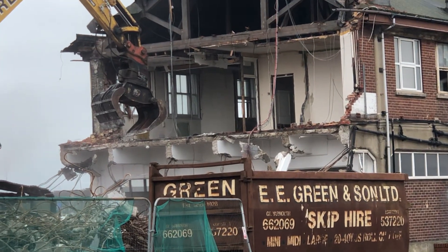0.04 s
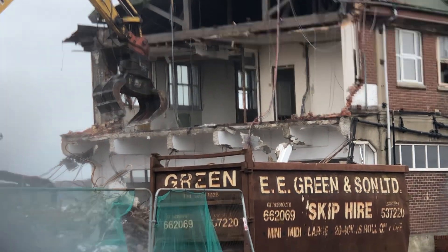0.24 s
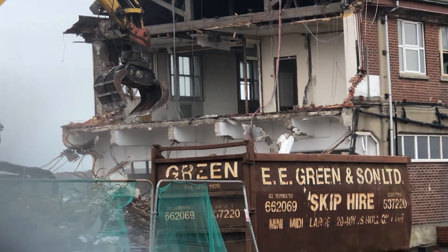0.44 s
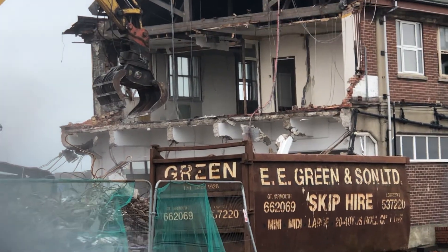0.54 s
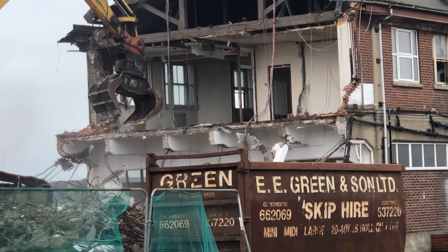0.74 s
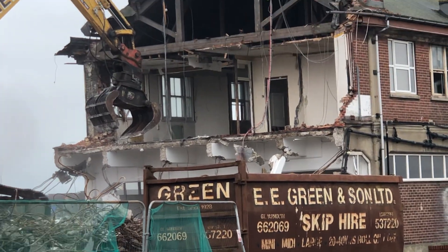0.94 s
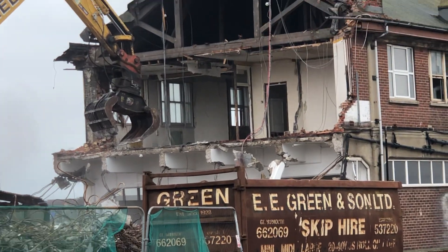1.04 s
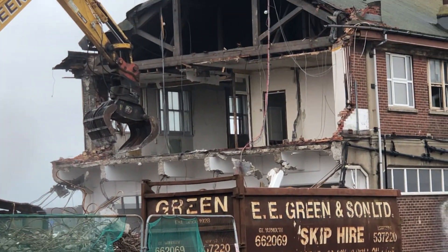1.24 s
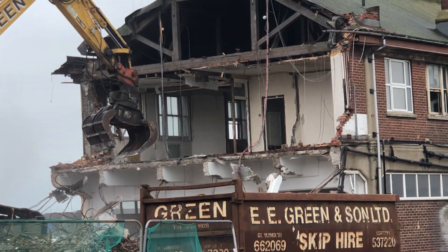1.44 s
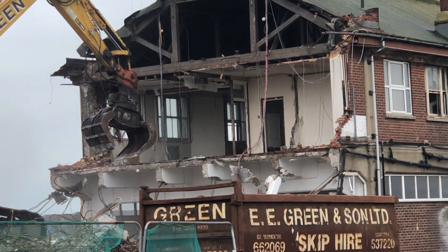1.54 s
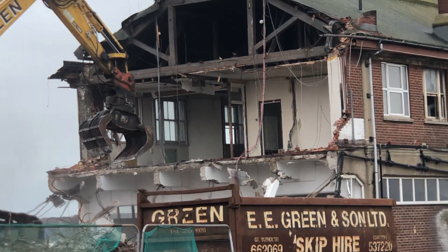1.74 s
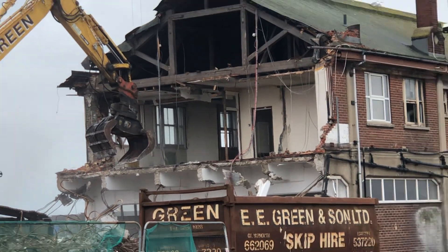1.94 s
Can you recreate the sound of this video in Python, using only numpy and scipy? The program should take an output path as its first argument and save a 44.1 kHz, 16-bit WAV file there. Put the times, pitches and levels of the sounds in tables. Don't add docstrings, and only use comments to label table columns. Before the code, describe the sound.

Demolition debris crashes down with a sharp crack, rubble tumbling, then two separate heavy knocks outdoors

```python
import sys
import numpy as np
from scipy import signal
from scipy.fft import rfft, irfft, next_fast_len
from scipy.io import wavfile
from scipy.ndimage import uniform_filter1d, minimum_filter1d, map_coordinates

SR = 44100
rng = np.random.default_rng(int(sys.argv[2]) if len(sys.argv) > 2 else 0)


def undo_db(level):
    steps = np.asarray(level, float) / 20
    return 10 ** steps


def master_out(mix):
    frames = np.transpose(np.atleast_2d(mix))
    ceiling = np.clip(frames, -1, 1)
    pcm = np.round(ceiling * 32767).astype(np.int16)
    wavfile.write(sys.argv[1], SR, pcm)


N = 88200
M = next_fast_len(N + 8192)
HZ = np.fft.rfftfreq(M, 1 / SR)
T = np.arange(N) / SR


def unit(x):
    return x / np.sqrt(np.mean(x ** 2) + 1e-20)


def colour(points):
    hz, db = np.transpose(points)
    return undo_db(np.interp(np.log(HZ + 1), np.log(hz + 1), db, left=-120, right=-120))


def curves(rows):
    s, *columns = np.transpose(rows)
    return [np.interp(T, s, column, left=-120, right=-120) for column in columns]


def wobble(rate):
    knots = rng.standard_normal(int(N * rate / SR) + 4)
    return map_coordinates(knots, [np.arange(N) * rate / SR])


def filtered(x, gain):
    return irfft(rfft(x, M) * gain, M)[:N]


def noise(points):
    return unit(filtered(rng.standard_normal(N), colour(points)))


def swell(centre_s, width_s):
    return np.exp(-.5 * ((T - centre_s) / width_s) ** 2)


def resonance(hz, above_oct, below_oct=None):
    octaves = np.log2((HZ + 1) / hz)
    width = np.where(octaves > 0, above_oct, below_oct or above_oct)
    return np.exp(-.5 * (octaves / width) ** 2)


def peak(response):
    return response * M / (2 * abs(response).sum())


def at(s):
    return np.exp(-2j * np.pi * HZ * s)


def causal(gain):
    cepstrum = irfft(np.log(gain + 1e-5), M)
    k = np.arange(M)
    fold = np.where(k < M / 2, 2, 0) / np.where(k == 0, 2, 1)
    return np.exp(rfft(cepstrum * fold))


# (time [s], level [dB])
DIESEL = [
    (0, -55.5),
    (.7, -56),
    (1.15, -56),
    (1.36, -54),
    (1.602, -57.5),
    (1.859, -54),
    (1.898, -49),
    (2.0, -56.5),
]
# (frequency [Hz], density [dB per Hz])
DRONE = [(15, -31), (25, -4), (157, -7), (184, -6.5), (205, -13.5), (252, -14.5), (380, -21), (450, -13),
         (580, -55.5), (990, -120)]
# (frequency [Hz], density [dB per Hz])
FAN = [(190, -37.5), (330, -13), (385, -28), (603, -1), (1030, 0.5), (1110, -5), (1170, -2.5),
       (1900, -17.5), (3500, -56), (4550, -73), (7700, -120)]
# (frequency [Hz], level [dB])
WHINE = [(37.7, -66.5), (80.7, -66), (543.7, -73), (775.2, -70), (952.8, -82), (1055, -70.5), (1179, -72),
         (1502, -77.5), (2223, -92)]
DRONE_DB, DRONE_GROWS = -2, 1.2
STRAIN_S, STRAIN_WIDTH_S, STRAIN_HZ, STRAIN_DB = 1.33, .09, 2223, -75.5


def excavator():
    s, db = np.transpose(DIESEL)
    load_db = np.interp(T, s, db)
    roar = undo_db(load_db + 0.4 * wobble(4.2) + 0.52 * wobble(35)) * noise(FAN)
    drone_db = db.mean() + DRONE_DB + DRONE_GROWS * (load_db - db.mean())
    drone = undo_db(drone_db + 1.5 * wobble(12)) * noise(DRONE)
    tones = 0
    for hz, level_db in WHINE:
        phase = 2 * np.pi * hz * T + 2.43 * wobble(15)
        tones = tones + undo_db(level_db + 4.5 + 4.3 * wobble(5.7)) * np.sin(phase)
    strain_phase = 2 * np.pi * STRAIN_HZ * T + 2.5 * wobble(25)
    strain = undo_db(STRAIN_DB + 3 * wobble(20)) * swell(STRAIN_S, STRAIN_WIDTH_S) * np.sin(strain_phase)
    return roar + drone + tones + strain


# (time [s], level [dB], centre [Hz], width [octaves])
TICKS = [(0.2259, -46.5, 1096, 0.48), (0.2387, -38.5, 1090, 0.42), (0.2492, -12.5, 1300, 0.27),
         (.2508, -16, 480, .3), (0.4188, -32, 851, .3), (.675, -46, 1485, 0.22), (.6748, -35.5, 760, .22),
         (.613, -30, 850, .15), (.646, -40, 850, .2), (.6295, -36, 850, .15), (.297, -18, 850, .12),
         (1.742, -25, 620, .33), (.3335, -17, 760, .2), (.2735, -20, 800, .13), (1.762, -40, 70, .3),
         (1.5125, -11.5, 706, 0.23), (1.516, -27, 427, 0.12), (1.523, -38, 600, .2),
         (0.3333, -45.5, 3190, 0.3), (.5845, -52, 2700, 0.23), (0.3318, -50.5, 4380, 0.39),
         (0.3359, -39, 2470, 0.3), (.5843, -53, 3970, 0.16), (0.585, -45.5, 1750, 0.28),
         (.5962, -46, 2520, 0.19), (.597, -38.5, 1636, 0.18), (0.6016, -30.5, 1430, 0.18),
         (.6015, -53.5, 3260, 0.31), (.607, -53, 2330, 0.11), (0.649, -48, 1500, 0.27),
         (1.511, -57, 3500, 0.2), (.599, -47.5, 2280, 0.34), (1.5122, -45, 2260, 0.21),
         (1.7308, -31.5, 1730, 0.49), (1.7314, -45.5, 4200, 0.35), (1.7418, -46, 2170, 0.26),
         (1.7415, -52.5, 5000, 0.5), (1.888, -57, 800, 0.71)]


def ticks():
    total = sum(undo_db(db) * peak(resonance(hz, width)) * at(s) for s, db, hz, width in TICKS)
    return irfft(total, M)[:N]


# (time [s], knock [dB], knock tilt [dB per octave], thud pitch [Hz], thud [dB])
BLOWS = [(.2265, -36, 0.5, 381, -41), (0.237, -41, -0.5, 299, -43), (0.2485, 1.5, 5.5, 205, -7.5),
         (0.2656, -15.5, -0.3, 70, -14.5), (.3315, -11, 0.5, 332, -12.5), (.3347, -15, 8, 95, -13.5),
         (.3372, -30, 0, 150, -13), (.4185, -24.5, -4.5, 110, -21), (.394, -36.5, 0, 90, -32),
         (.5955, -31.5, 1.5, 307, -31), (1.5107, -3.5, -0.2, 87, -23.5), (1.5131, -31.5, -3.8, 192.3, -8.5),
         (1.7304, -5.5, -0.5, 223, -15), (1.7319, -39.5, -0.5, 76.6, -17.5),
         (1.7411, -21.5, -0.5, 119.5, -23.5)]
# (frequency [Hz], level [dB])
KNOCK = [(60, -59), (200, -17), (420, 0), (680, 2.5), (950, -4), (1300, -14), (1650, -23.5), (1900, -45.5)]
KNOCK_HZ = 700
THUD_OCT, THUD_BELOW_OCT = 0.43, 0.79
ECHO_S, ECHO_SHARE = 0.00352, 0.19


def blows():
    knock, total = causal(colour(KNOCK)), 0
    for s, knock_db, tilt_db, thud_hz, thud_db in BLOWS:
        thud = peak(resonance(thud_hz, THUD_OCT, THUD_BELOW_OCT))
        tilt = undo_db(tilt_db * np.log2((HZ + 50) / KNOCK_HZ))
        total = total + (undo_db(thud_db) * thud + undo_db(knock_db) * peak(knock * tilt)) * at(s)
    return irfft(total * (1 + ECHO_SHARE * at(ECHO_S)), M)[:N]


# (frequency [Hz], level [dB])
SNAP = [(1200, -17.5), (1850, -3), (2400, 1), (3300, -8), (4500, -28), (5300, -48.5), (7000, -44.5),
        (15700, -64)]
CRACK_S, CRACK_DB = .2494, -16


def timber_snap():
    return irfft(undo_db(CRACK_DB) * peak(colour(SNAP)) * at(CRACK_S), M)[:N]


# (time [s], level [dB], brightness [dB])
TUMBLE = [
    [(.254, -17, -2), (.266, -17.5, 3.5), (.3, -16, 3), (.312, -20, 7.5), (.324, -20, -2.5),
     (.336, -18, -3)],
    [(.336, -16.5, 4), (.372, -26, 2.5), (.41, -20.5, -3.5), (.45, -22.5, -2), (.55, -24, -8),
     (.585, -25.5, -4.5), (.655, -34, -3.5), (.679, -41, -4.5), (.688, -66, -2.5)],
]
# (frequency [Hz], level [dB])
LUMPS = [(25, -42), (45, -16), (90, -5), (200, -3), (350, -6.5), (500, -12.5), (800, -39)]
# (frequency [Hz], level [dB])
CHIPS = [(150, -52.5), (330, -16), (450, -6), (600, -1.5), (850, -3), (1050, -14), (1500, -45.5)]
# (frequency [Hz], level [dB])
FLAKES = [(700, -26), (1000, -5), (1350, 3.5), (1650, -4.5), (1900, -24), (2600, -27.5), (4500, -55.5)]
STONES_PER_S, STONE_SPREAD_DB = 2500, 2.5
FLAKES_DB, FLAKES_FADE_DB_PER_S, CLUMP_DB = -18.5, 14.5, 1.1


def rubble():
    out = np.zeros(N)
    since_start = T - TUMBLE[0][0][0]
    flakes_db = FLAKES_DB - FLAKES_FADE_DB_PER_S * since_start + CLUMP_DB * wobble(70)
    for surge in TUMBLE:
        level_db, bright_db = curves(surge)
        layers = (LUMPS, -7.5), (CHIPS, bright_db - 10.5), (FLAKES, bright_db + flakes_db)
        for shape, extra_db in layers:
            hits = (rng.random(N) < STONES_PER_S / SR) * rng.standard_normal(N)
            stones = hits * undo_db(STONE_SPREAD_DB * rng.exponential(size=N))
            scale = np.std(filtered(stones, colour(shape)))
            out += filtered(stones * undo_db(level_db + extra_db), colour(shape)) / scale
    return out


# (time [s], width [s], level [dB])
GRIT = [
    (0.28, 0.014, -50.5),
    (0.336, 0.0047, -46.5),
    (.655, 0.01, -68.5),
]
# (frequency [Hz], level [dB])
SHARDS = [(1700, -27.5), (2200, 2), (2550, -7.5), (2900, -21.5), (4200, -32.5), (6000, -47.5)]


def grit():
    return sum(undo_db(db) * swell(s, width) for s, width, db in GRIT) * noise(SHARDS)


# (time [s], length [s], level [dB])
RATTLES = [
    (.264, .046, -68),
    (.331, .054, -67),
]
# (frequency [Hz], level [dB])
DUST = [(2000, -15.5), (3000, -7), (9000, -9.5), (15500, -15.5)]


def dust():
    gate = 0
    for s, length, db in RATTLES:
        gate = gate + undo_db(db) * np.clip(np.minimum(T - s, s + length - T) / .003, 0, 1)
    return gate * undo_db(1.1 * wobble(120)) * noise(DUST)


# (time [s], level [dB], pitch [Hz])
TIMBER = [(0.2679, -12, 671), (0.2769, -15, 572), (0.2844, -19.5, 645), (0.2913, -14.5, 619),
          (0.3083, -12, 645), (0.3337, -11, 619), (0.3447, -22.5, 671), (0.3507, -20.8, 528),
          (0.3687, -24, 619), (0.3776, -22.5, 572), (0.3986, -26.5, 508), (0.4185, -21.5, 595),
          (0.4335, -22, 595), (0.4425, -25, 550), (0.4649, -25.9, 671), (0.4679, -24.5, 416),
          (0.4779, -30.5, 550), (0.4929, -28, 550), (0.5049, -29.5, 619), (0.5118, -31.5, 416),
          (0.5198, -28, 572), (0.5278, -42, 960), (0.5358, -30, 595), (0.5483, -33, 645),
          (0.5582, -34, 488), (0.5677, -29.5, 595), (0.5817, -36, 433), (0.5996, -31, 572),
          (0.6121, -24.5, 595), (0.6291, -29.5, 671), (0.647, -41.5, 645), (0.675, -39, 698)]
# (time [s], level [dB], pitch [Hz])
BRICKS = [(0.2679, -14, 218), (0.2908, -12.5, 203), (0.3023, -19, 111), (0.3322, -10.5, 305),
          (0.3377, -10, 178), (0.3801, -24, 249), (0.3851, -22.5, 119), (0.4156, -22, 373),
          (0.4176, -18.5, 190), (0.4545, -25, 373), (0.4545, -22.5, 218), (0.4764, -31, 97),
          (0.4824, -23.5, 267), (0.4954, -25.5, 203), (0.5103, -28, 285), (0.5118, -29.5, 155),
          (0.5383, -24.5, 218), (0.5557, -28.5, 249), (0.5717, -33.2, 90), (0.6006, -21, 166),
          (0.6016, -23.5, 349), (0.64, -35.8, 349), (0.642, -28.5, 145), (0.651, -34.3, 267),
          (0.675, -42.5, 326)]
# (time [s], level [dB], pitch [Hz])
SLATES = [(0.2699, -28.5, 1339), (0.2734, -27, 1024), (0.2893, -34, 1549), (0.3003, -30.5, 1339),
          (0.3078, -30.5, 1339), (0.3362, -21.5, 1049), (0.3547, -31.5, 1405), (0.3687, -30, 1339),
          (0.3781, -34, 1339), (0.4096, -41, 1405), (0.4161, -40.5, 1440), (0.4176, -40, 1185),
          (0.435, -40, 1306), (0.4899, -44, 1339), (0.5852, -40, 1475), (0.5971, -31, 1440),
          (0.6101, -42, 1102), (0.65, -46.5, 1512), (0.6685, -49, 1075), (0.679, -52, 1049)]
TIMBER_OCT, BRICK_OCT, SLATE_OCT = 0.12, 0.17, 0.075


def ringing_pieces():
    total = 0
    for rows, width in (TIMBER, TIMBER_OCT), (BRICKS, BRICK_OCT), (SLATES, SLATE_OCT):
        for s, db, hz in rows:
            total = total + undo_db(db) * peak(resonance(hz, width)) * at(s)
    return irfft(total, M)[:N]


def scene():
    impacts = ticks() + blows() + timber_snap()
    pour = rubble() + grit() + dust() + ringing_pieces()
    return (excavator() + impacts + pour)[None]


def low_pass(x):
    return signal.sosfilt(signal.butter(12, 15750, fs=SR, output="sos"), x)


# (frequency [Hz], density [dB per Hz])
HISS = [(1200, -25.5), (2200, 8), (3000, 3.5), (4500, 1), (7000, -3.5), (10000, -7), (15800, -13)]
HISS_DB, LOW_CUT_HZ = -74, 36
SMEAR_CYCLES, SMEAR_HZ = 1.3, 25
LIMIT, LIMIT_SPAN = .92, 131


def record(dry):
    smear = np.exp(-2j * np.pi * SMEAR_CYCLES * np.log((HZ + 1) / SMEAR_HZ))
    low_cut = 1 / np.sqrt(1 + (LOW_CUT_HZ / (HZ + 1)) ** 8)
    x = filtered(dry[0], smear * low_cut) + undo_db(HISS_DB) * noise(HISS)
    needed_gain = LIMIT / np.maximum(abs(x), LIMIT)
    x = x * uniform_filter1d(minimum_filter1d(needed_gain, LIMIT_SPAN), LIMIT_SPAN)
    return low_pass(x[None])


dry = scene()
out = record(dry)
master_out(out)
```